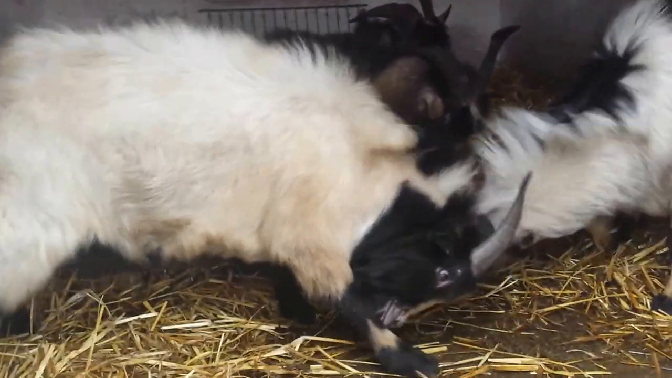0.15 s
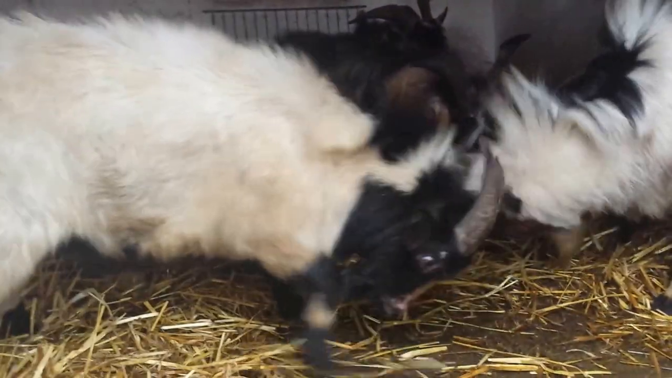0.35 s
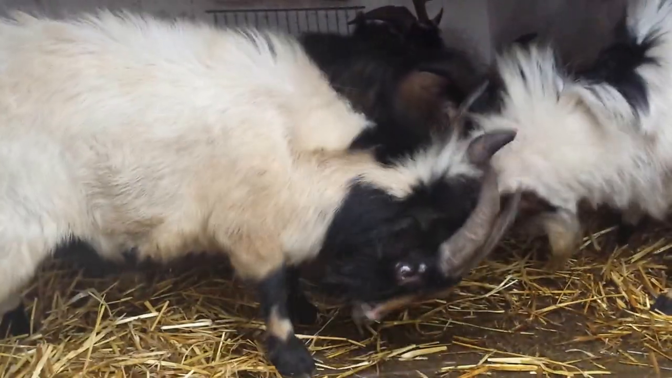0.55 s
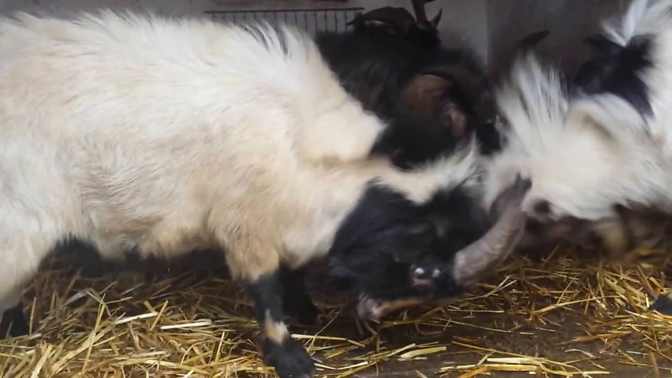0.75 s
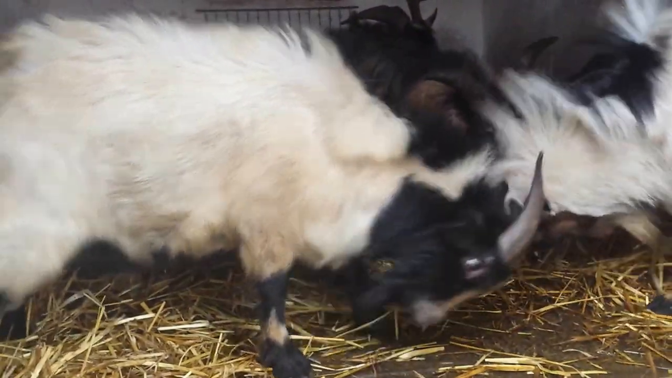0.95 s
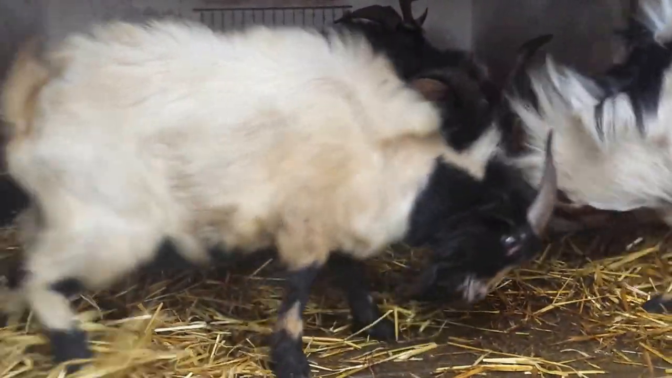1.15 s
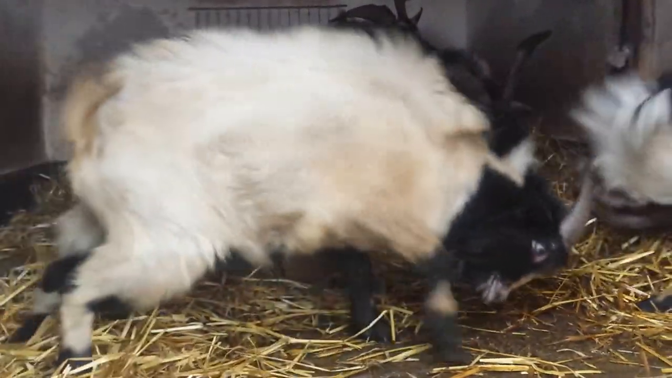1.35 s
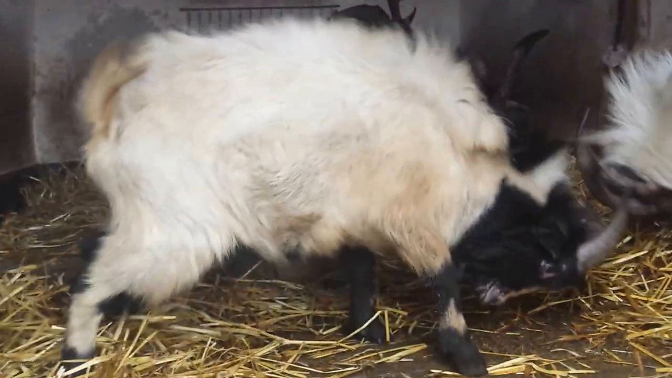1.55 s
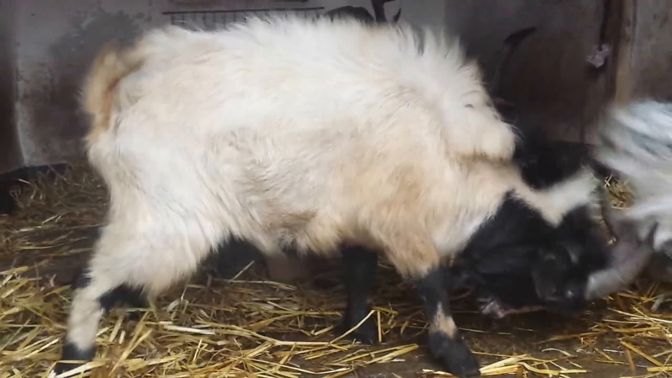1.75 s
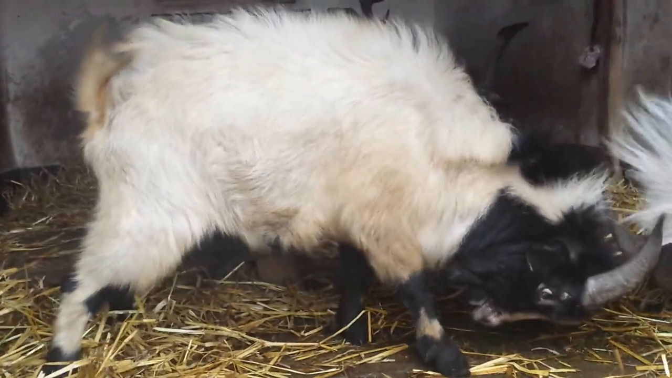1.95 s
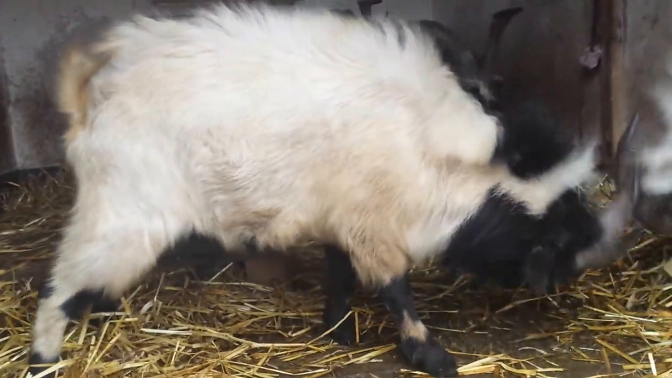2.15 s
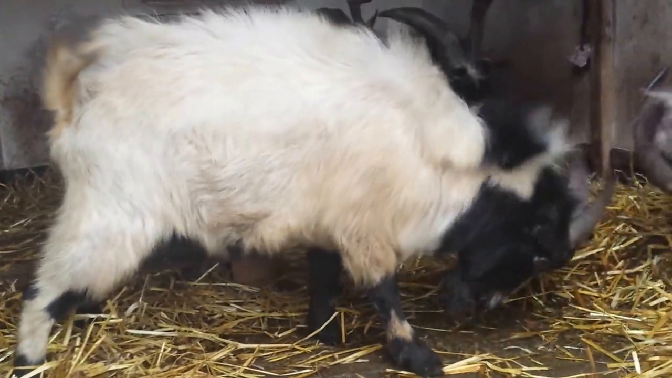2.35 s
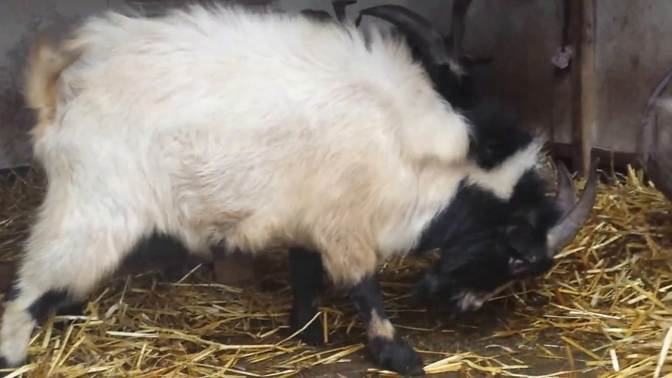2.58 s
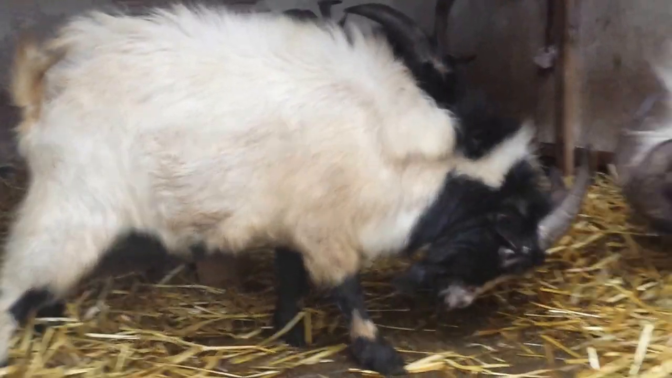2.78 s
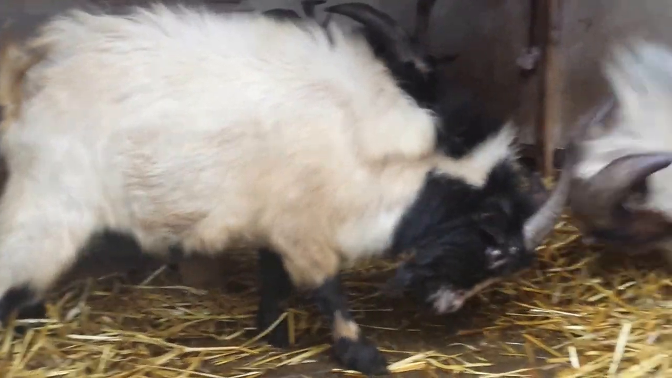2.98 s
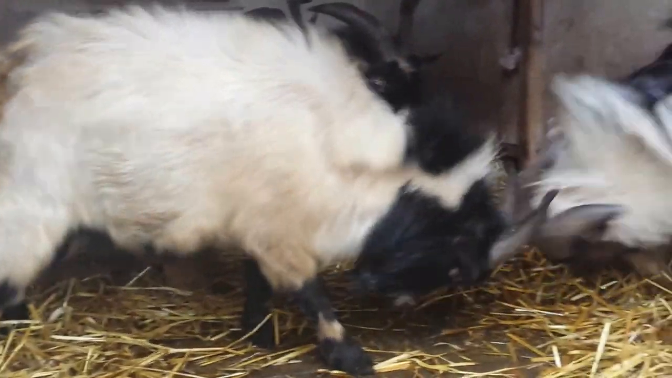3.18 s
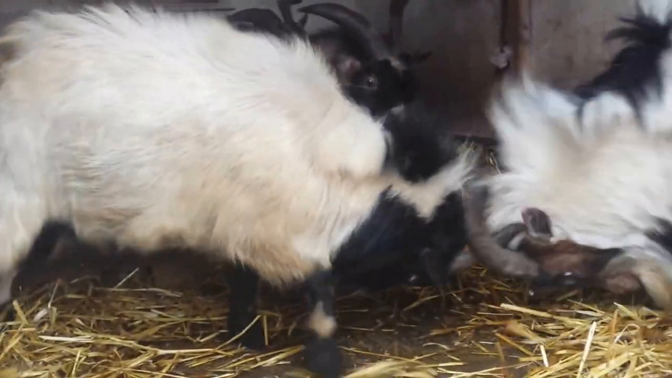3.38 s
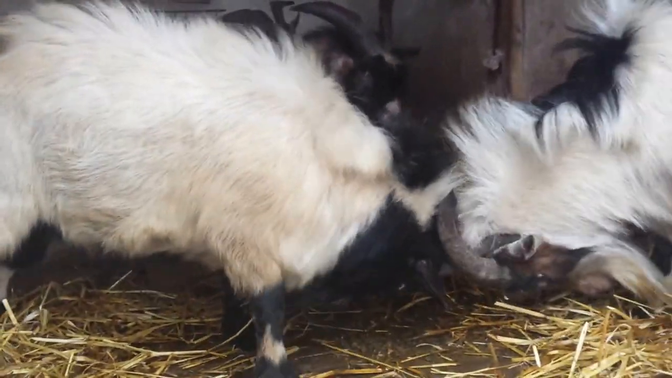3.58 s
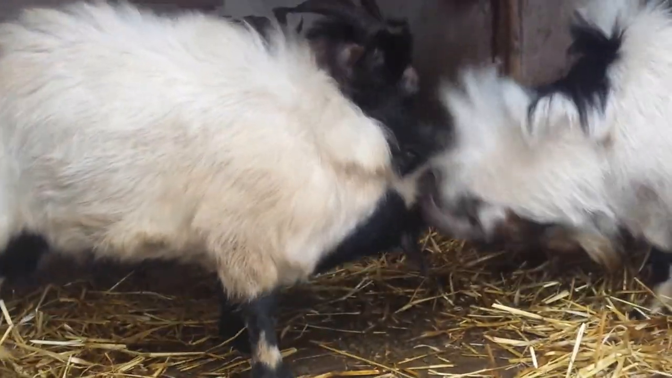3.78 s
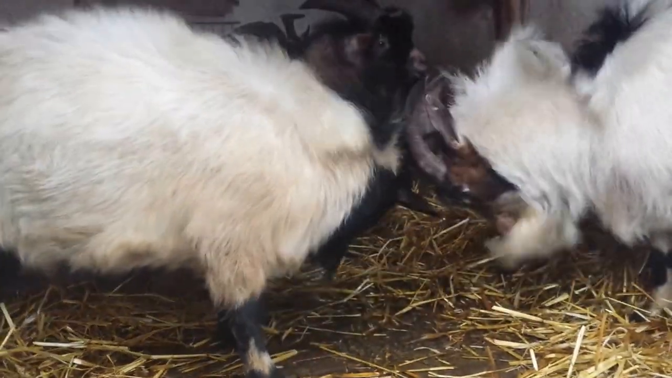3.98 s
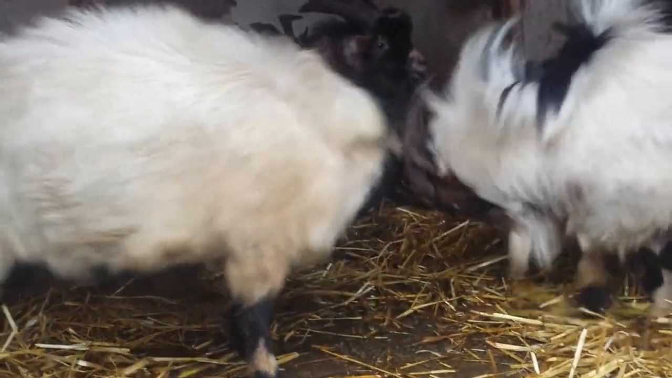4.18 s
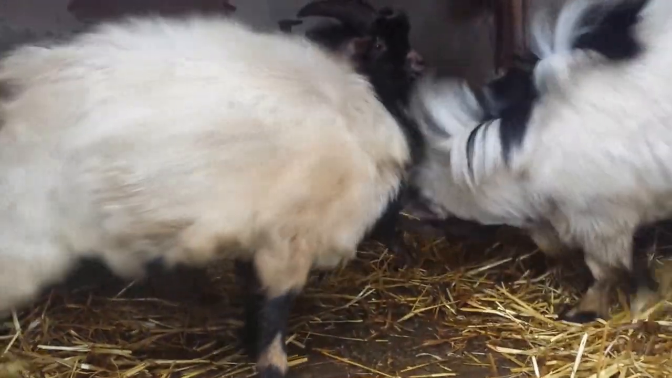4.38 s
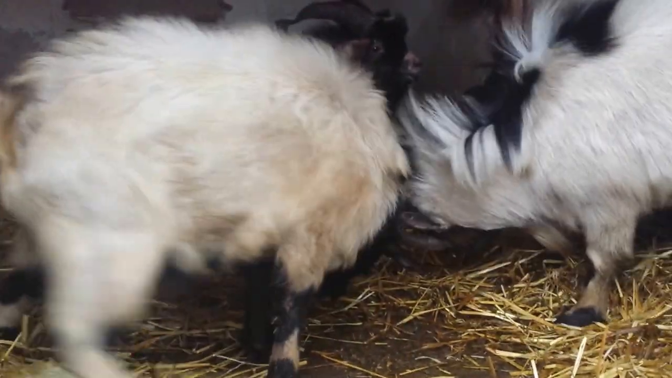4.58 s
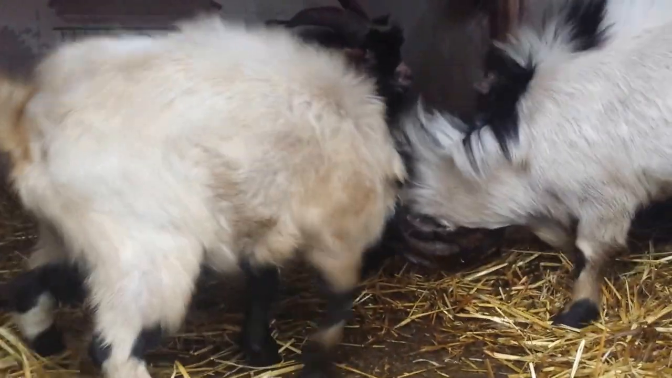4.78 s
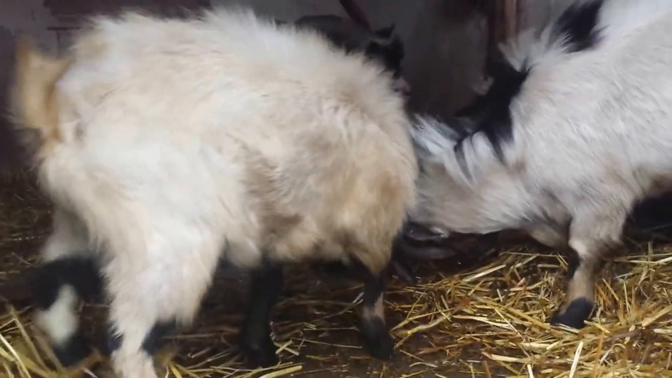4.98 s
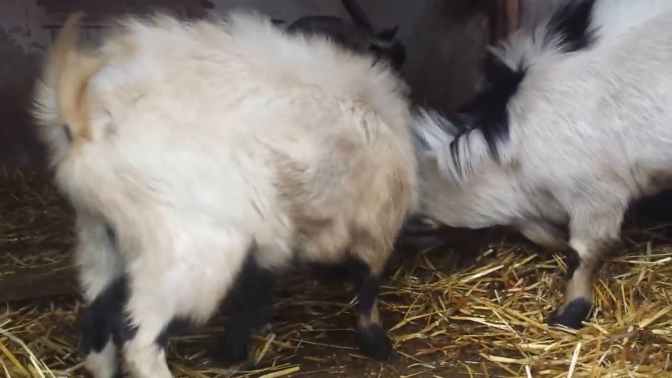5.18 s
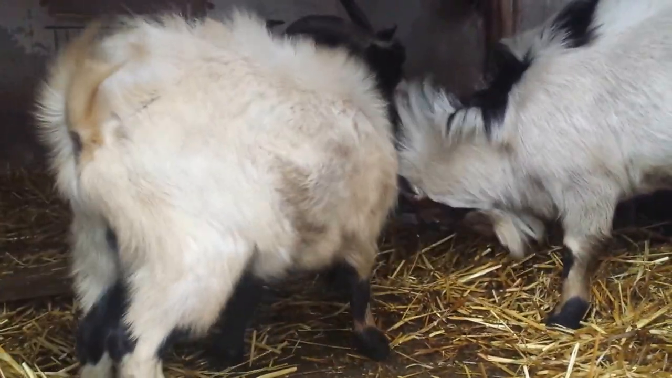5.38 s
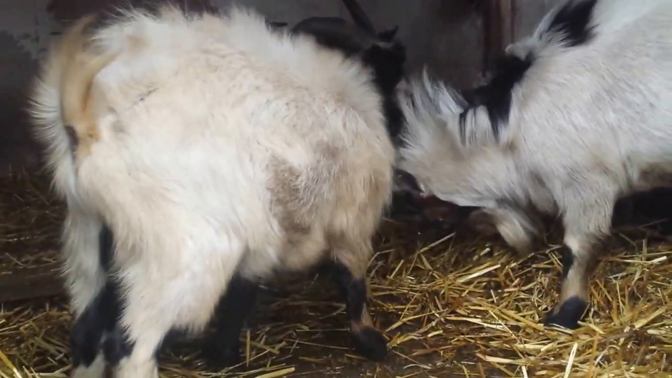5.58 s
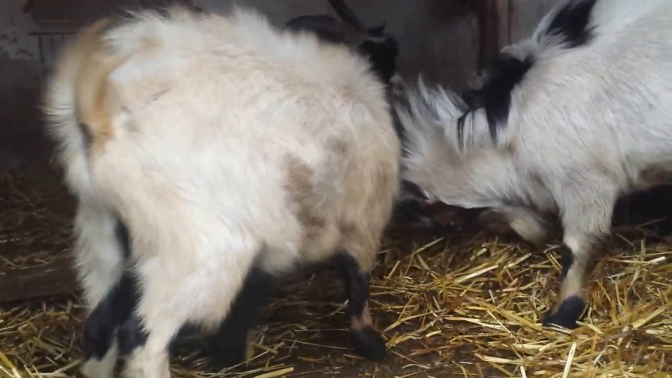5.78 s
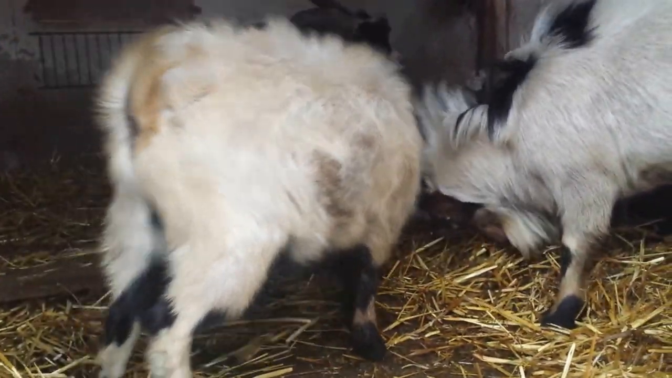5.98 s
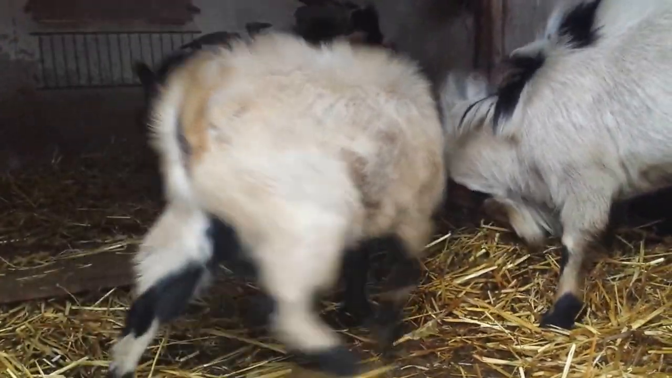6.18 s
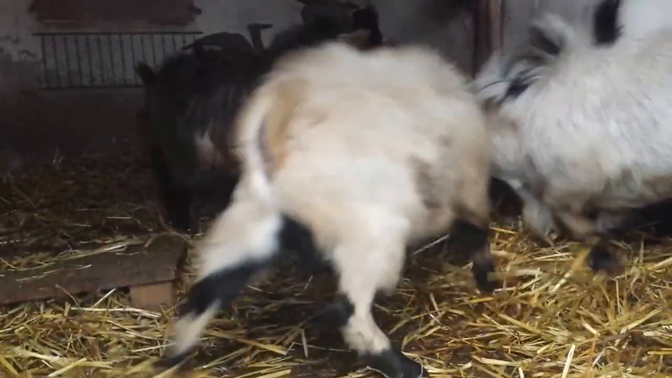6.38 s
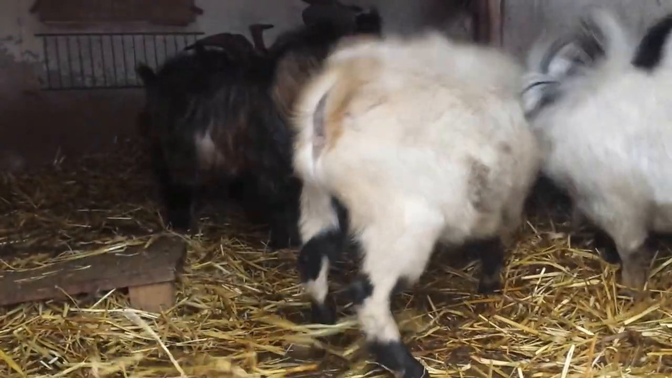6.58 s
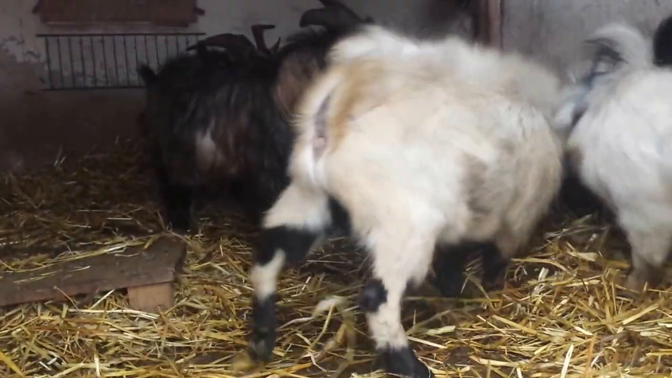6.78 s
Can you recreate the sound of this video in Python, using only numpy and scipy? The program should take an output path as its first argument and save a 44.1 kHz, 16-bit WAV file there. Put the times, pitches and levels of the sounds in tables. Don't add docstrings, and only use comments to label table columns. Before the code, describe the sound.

Close hand-held stereo pickup of goats sparring on straw. Bright stem snaps and fizzing rustle lead, mixed with hollow horn taps and low thumps through the floor. The struggle eases after two seconds into fainter ticks and shuffling, with a few knocks and crisp snaps around four to five seconds. Near six seconds soft low gusts brush the microphone, then bodies bang the boards amid renewed rustling.

```python
import sys
import numpy as np
from scipy import signal
from scipy.io import wavfile
from scipy.ndimage import uniform_filter1d

SR = 44100
rng = np.random.default_rng(int(sys.argv[2]) if len(sys.argv) > 2 else 0)


def master_out(mix):
    frames = np.transpose(np.atleast_2d(mix))
    ceiling = np.clip(frames, -1, 1)
    pcm = np.round(ceiling * 32767).astype(np.int16)
    wavfile.write(sys.argv[1], SR, pcm)


def linear_from_db(decibels):
    return 10 ** (np.asarray(decibels, float) / 20)


N = 302085

# frequency in Hz, density in dB per Hz.
HUSH_COLOUR = [(18, -44), (30, 20.5), (340, 1.5), (815, 1.5), (1480, -10.5), (3500, -32), (5880, -40),
               (14000, -10)]
HUSH_DB = -58
# frequency in Hz, left-right likeness from 0 to 1.
COHERENCE = [(60, 0.97), (300, 0.82), (640, 0.78), (1400, 0.054), (15000, 0)]
# frequency in Hz, 60 dB decay time in seconds.
STALL_DECAY = [(100, 0.36), (500, 0.16), (2000, 0.23), (6000, 0.1), (14000, 0.011)]
# frequency in Hz, width in Hz, lift in dB.
PORTS = [
    [(2570, 4100, 5), (6030, 2160, 16), (12000, 1300, -8.5)],
    [(2300, 2400, 8.5), (7660, 3500, 11), (12900, 13800, 1.5)],
]

# time in seconds, level in dB.
SHUFFLE = [(0.0, -36.5), (0.15, -47), (0.46, -49), (0.8, -52), (1.09, -44), (1.43, -48.5), (1.93, -42),
           (2.02, -56), (2.21, -42), (2.52, -60), (2.78, -59.5), (3.7, -49.5), (5.02, -48), (5.99, -51.5),
           (6.39, -44), (6.52, -43), (6.68, -58), (6.85, -46)]
# frequency in Hz, density in dB per Hz.
SHUFFLE_COLOUR = [(20, -28.5), (40, 6.5), (70, -4.5), (130, -2.5), (250, -8.5), (450, -15.5), (900, -28)]

# centre in seconds, level in dB,
# length in seconds, port (0 left, 1 right).
PUFFS = [(3.848, -43.5, 0.13, 1), (4.187, -49, 0.059, 1), (5.227, -55, 0.08, 1), (5.462, -32, 0.037, 0),
         (5.538, -44, 0.14, 0), (5.687, -39.5, 0.061, 0), (5.748, -49, 0.044, 1), (5.83, -39, 0.12, 1),
         (5.989, -29.5, 0.093, 0), (6.044, -31, 0.086, 0), (6.052, -31, 0.072, 1), (6.138, -36, 0.1, 0),
         (6.194, -16, 0.08, 1), (6.299, -21.5, 0.044, 1), (6.36, -26.5, 0.17, 0), (6.668, -29.5, 0.12, 0),
         (6.802, -43, 0.12, 1)]
# frequency in Hz, density in dB per Hz.
PUFF_COLOUR = [(20, -0.5), (45, 0), (80, 9), (130, 4.5), (220, -7), (400, -22), (700, -45)]

# frequency in Hz, width in Hz, level in dB.
BOARD_MODES = [(315, 28, 0), (398, 35, 0), (516, 28, 3), (585, 28, -1), (684, 35, -1), (775, 35, 2),
               (910, 60, -1), (1170, 70, -3), (1410, 60, -2), (1660, 90, -4)]
# start in seconds, peak in dB, boom in Hz, 60 dB decay time in seconds.
HOOVES = [(0.084, -33.5, 204, 0.13), (1.04, -36, 105, 0.46), (0.985, -28, 68, 0.37),
          (3.84, -39.5, 330, 0.073), (1.76, -27.5, 160, 0.17), (0.37, -46.5, 246, 0.18),
          (0.45, -36, 102, 0.089), (0.705, -28, 109, 0.075), (0.72, -32, 73, 0.16), (0.76, -28, 130, 0.4),
          (1.4574, -37.5, 290, 0.046), (5.207, -36.5, 61, 0.11), (1.73, -16, 207, 0.05),
          (1.705, -23, 220, 0.21), (1.7239, -19.5, 157, 0.25), (3.322, -42, 82, 0.53),
          (3.549, -42, 173, 0.62), (4.306, -37, 117, 0.041)]
HOOF_CLATTER_DB, HOOF_SPOT_HZ = -20, 474
# start in seconds, peak in dB,
# struck spot in Hz, 60 dB decay time in seconds.
RAPS = [(0.068, -22.5, 1060, 0.12), (1.146, -31.5, 695, 0.19), (1.225, -32, 590, 0.11),
        (1.519, -26, 521, 0.18), (1.533, -32, 516, 0.13), (1.62, -38, 536, 0.2), (1.869, -26, 1020, 0.099),
        (2.135, -41.5, 1420, 0.58), (2.19, -42, 1410, 0.21), (6.415, -23, 1000, 0.075),
        (6.62, -30, 800, 0.12), (0.985, -28, 398, 0.083), (2.02, -23.5, 790, 0.093), (6.4, -48, 520, 0.061),
        (2.229, -37, 454, 0.14), (3.91, -31.5, 785, 0.1), (5.17, -36, 465, 0.22), (5.19, -35.5, 770, 0.2),
        (5.279, -40, 393, 0.17), (5.29, -42.5, 1170, 0.16)]
RAP_BOOM_DB, RAP_BOOM_HZ = -17, 148
# start in seconds, peak in dB, boom in Hz, struck spot in Hz, 60 dB decay time in seconds.
SLAMS = [(0.975, -23, 132, 470, 0.18), (0.999, -33, 111, 500, 0.55), (1.689, -36, 196, 840, 0.41),
         (2.004, -24.5, 143, 706, 0.24), (2.336, -50, 305, 870, 0.54), (3.053, -41.5, 188, 865, 0.091),
         (3.462, -49.5, 306, 869, 0.29), (3.835, -36, 121, 824, 0.31), (4.178, -42, 95, 637, 0.37),
         (6.371, -22, 231, 402, 0.31), (6.392, -17, 175, 480, 0.2), (6.546, -23, 174, 343, 0.23),
         (6.608, -22.5, 162, 680, 0.068)]
SLAM_CLATTER_DB = -0.5
CONTACT = 1.5
REACH_DB_PER_OCTAVE = 23.0

# frequency as a ratio to the ring, level in dB.
HORN_MODES = [(1, 0), (.85, -6), (1.17, -4), (.72, -19), (1.4, -14), (1.9, -21)]
# start in seconds, peak in dB, ring in Hz, 60 dB decay time in seconds, echo in dB.
TAPS = [(0.0633, -21, 1970, 0.012, -7), (0.0645, -15, 1100, 0.0089, -21), (0.0705, -28, 1800, 0.003, -5),
        (0.094, -33.5, 1000, 0.0092, -4), (0.373, -35.5, 2670, 0.0047, -4), (0.427, -40, 1900, 0.0076, 2.5),
        (0.634, -30, 2560, 0.0072, -13), (0.7755, -12.5, 2130, 0.0077, -14),
        (0.7768, -23, 2730, 0.0041, -2), (0.783, -27, 1860, 0.008, -16), (0.792, -27.5, 2270, 0.018, -4),
        (0.799, -29, 2400, 0.01, -11), (0.804, -26, 2100, 0.01, -3), (0.811, -33, 2520, 0.007, 0),
        (1.147, -30.5, 714, 0.0062, -5), (1.1492, -33, 1970, 0.0032, 3.5),
        (1.23, -23.5, 2220, 0.0074, -6.5), (1.62, -21, 2570, 0.0045, -5),
        (1.6189, -27.5, 940, 0.0029, -3.5), (1.636, -35, 2100, 0.0087, -3), (1.689, -29.5, 1020, 0.0029, 0),
        (1.69, -21, 2640, 0.0064, -9), (1.872, -44, 1040, 0.022, -10), (3.055, -40, 960, 0.0025, -1),
        (3.066, -43, 1950, 0.0057, -10), (3.089, -41, 2250, 0.0068, -7), (3.3215, -28.5, 1820, 0.0042, -10),
        (3.323, -34, 764, 0.018, -7), (3.338, -35.5, 870, 0.023, -8), (3.463, -31, 2110, 0.0025, -11),
        (3.465, -31, 940, 0.017, -10), (3.834, -31.5, 1700, 0.017, -8), (3.909, -31.5, 1900, 0.01, -4),
        (3.913, -29, 1800, 0.0068, -18), (3.888, -39, 1500, 0.003, 4.5), (3.929, -38, 1850, 0.014, -9),
        (3.93, -36, 900, 0.015, -4), (4.7005, -24, 3070, 0.0056, -5), (5.17, -42.5, 970, 0.0038, 4),
        (6.058, -41.5, 1130, 0.013, -5)]
# start in seconds,
# peak in dB, ring in Hz, 60 dB decay time in seconds, echo in dB.
CLASHES = [(0.9768, -24, 2680, 0.01, -20), (0.978, -20.5, 875, 0.0022, 3), (0.9805, -25, 1860, 0.006, -10),
           (0.982, -29, 3030, 0.005, -11), (3.8196, -26.5, 6100, 0.009, -5),
           (6.5505, -36.5, 1770, 0.004, -18), (1.731, -27.5, 1940, 0.013, -9),
           (1.7505, -18.5, 1780, 0.014, -7.5), (2.009, -20.5, 2300, 0.0025, -4.5),
           (6.399, -22.5, 1590, 0.011, -8), (6.548, -17.5, 1050, 0.0032, -4),
           (6.614, -18.5, 794, 0.0038, -9)]
TAP_LEAD, CLASH_LEAD = 4, 16

# start in seconds, peak in dB, left minus right in dB, pitch in Hz, 60 dB decay time in seconds.
SNAPS = [(0.063, -10, 11, 5470, 0.012), (0.0702, -9, 6, 6170, 0.0054), (0.633, -4.5, 4.5, 6100, 0.0059),
         (0.7745, -1, 1.5, 7500, 0.003), (0.811, -14, 12, 5900, 0.004), (0.8655, -11, 7, 8800, 0.008),
         (0.9073, -2.5, 1, 9800, 0.01), (0.9748, -8, 3, 5330, 0.0052), (0.9795, -18, 4, 4200, 0.0098),
         (1.053, -16, 0, 6800, 0.011), (1.0986, -22, -1, 6800, 0.006), (1.1025, -28, -2, 7700, 0.004),
         (1.2295, -13.5, 12, 5560, 0.0055), (1.3546, -14.5, 2, 7860, 0.0061), (1.511, -8, -4, 7000, 0.0049),
         (1.618, -17.5, 5, 4970, 0.007), (1.6885, -15, 6, 5700, 0.0063), (1.7495, -16, 0.5, 6500, 0.0068),
         (1.943, -9.5, 5, 5170, 0.012), (2.0078, -16.5, 7, 5970, 0.0086), (2.0963, -18, -4.5, 8500, 0.0041),
         (3.0888, -21.5, -2, 5400, 0.0057), (3.24, -19, 4, 8100, 0.0061), (3.778, -18, -11.5, 6200, 0.0045),
         (3.8198, -15, -5, 6100, 0.0062), (4.0438, -17.5, 9, 6570, 0.011),
         (4.286, -20.5, -15, 7960, 0.0082), (4.3608, -4.5, 7, 8300, 0.0048), (4.69, -14.5, -1, 8500, 0.003),
         (4.7002, -7.5, 1, 6480, 0.0064), (4.759, -14, -8.5, 9000, 0.011),
         (4.7922, -16.5, 1.5, 6500, 0.007), (6.393, -4, -12, 11000, 0.01),
         (6.3975, -17, -12, 11000, 0.0071), (6.4835, -16, 3, 7500, 0.0063)]
# start in seconds, peak in dB, pitch in Hz.
TICKS = [(0.293, -23, 6300), (0.6715, -18.5, 6520), (0.9164, -27, 8000), (1.726, -18, 6200),
         (1.73, -18, 5960), (1.8993, -33, 5870), (2.2365, -28, 5400), (3.841, -22, 6300), (5.8, -27, 8000),
         (5.628, -24, 9900), (5.912, -31, 8000), (2.17, -23, 7740), (2.3124, -34, 5950),
         (2.7736, -39.5, 9460), (2.811, -42, 5890), (3.0654, -50, 4480), (3.077, -30.5, 5880),
         (3.107, -36, 6180), (3.429, -25.5, 6100), (3.4994, -27.5, 3730), (3.9787, -23, 5800),
         (4.0044, -27, 5600), (3.447, -25, 6000), (3.21, -30, 6000), (3.344, -26, 6500), (4.194, -20, 8500),
         (4.485, -27, 6500), (4.905, -24, 6200), (5.199, -27.5, 6500), (1.331, -22, 3984),
         (0.96, -24, 6510), (4.211, -29, 5710), (4.375, -27, 5690), (4.5544, -37, 5910),
         (4.6424, -17, 6170), (4.7016, -11, 8350), (4.784, -25, 5780), (4.804, -38, 5876),
         (4.8708, -25, 6370), (5.077, -26, 5750), (5.184, -27, 5640), (5.415, -38, 8070),
         (5.6164, -15, 10800), (5.795, -20.5, 6440), (6.0907, -20, 6160), (6.3289, -22, 6100),
         (6.493, -19, 6030), (6.538, -29, 5510), (6.8218, -19, 5830)]
TICK_T60_S, SNAP_ECHO_DB = 0.0056, -10.5
CRACK_LOW, CRACK_HIGH = 0.56, 1.52

# frequency in Hz, density in dB per Hz.
RUSTLE = [(1500, -42), (3000, -3), (4500, 2.5), (7000, -0.5), (10000, 5), (14000, 6), (16000, -40)]
# frequency in Hz, density in dB per Hz.
CRUNCH = [(250, -8.5), (500, -1), (900, -3.5), (1500, -3.5), (2200, -3.5), (3200, -3.5), (4500, -6.5)]
# loudest moment in seconds, rustle in dB, swell in seconds, settle in seconds.
SWEEPS = [(0.001, -30, .05, 0.045), (0.079, -37.5, 0.02, 0.25), (0.246, -35.5, 0.15, 0.17),
          (0.4, -35.5, 0.13, 0.066), (0.645, -33, 0.12, 1), (0.863, -25.5, 0.061, 0.13),
          (1.116, -28, 0.049, 0.12), (1.24, -56, .1, 0.098), (1.526, -27.5, 0.2, 0.22),
          (1.741, -31.5, 0.066, 0.097), (1.865, -33.5, 0.077, 0.24), (2.102, -30.5, 0.062, 0.057),
          (2.33, -34, 0.12, 0.073), (3.1, -40.5, 0.012, 0.66), (3.256, -33, 0.052, 0.19),
          (3.657, -31, 0.031, 0.055), (3.836, -31, 0.17, 0.052), (4.201, -31, 0.099, 0.11),
          (4.371, -33.5, 0.012, 0.14), (4.519, -30.5, 0.11, 0.39), (4.754, -29, 0.19, 0.2),
          (5.081, -40.5, 0.29, 0.078), (5.195, -37.5, 0.38, 0.023), (5.67, -37, 0.18, 0.28),
          (5.908, -36.5, 0.031, 0.066), (6.003, -38.5, 0.023, 0.057), (6.133, -31.5, 0.069, 0.16),
          (6.37, -28.5, 0.053, 0.12), (6.54, -33, 0.37, 0.2), (6.847, -30, 0.16, .1)]
# time in seconds, crunch in dB, settle in seconds.
TREADS = [(0.083, -25.5, 0.04), (0.4, -41, 0.18), (0.65, -39, 0.027), (0.793, -29.5, 0.046),
          (1.007, -33.5, 0.065), (1.239, -31, 0.03), (1.74, -28.5, 0.073), (1.865, -38, 0.29),
          (2.028, -39.5, 0.31), (2.249, -38, 0.047), (3.087, -48, 0.053), (3.339, -40, 0.013),
          (3.493, -44.5, 0.057), (3.936, -51, 0.018), (5.195, -41.5, 0.077), (6.391, -26, 0.044),
          (6.552, -33.5, 0.13)]
TREAD_SWELL_S, SWEEP_CRUNCH_DB, STILL_DB, SWELL_BEND = 0.021, -8.5, -69, 1.6


def evened(x):
    return x / np.sqrt(np.mean(x ** 2) + 1e-20)


def read(points, hz):
    f, value = np.transpose(points)
    return np.interp(np.log(hz + 1), np.log(f + 1), value)


def add(mix, s, sound):
    part = mix[:, max(round(s * SR), 0):][:, :sound.shape[1]]
    part += sound[:, :part.shape[1]]


def chance(rows, size):
    strip = rng.standard_normal(N + size)
    return [strip[round(row[0] * 200) * SR // 200:][:size] for row in rows]


def causal(db):
    log_gain = np.log(linear_from_db(np.r_[db, db[-2:0:-1]]))
    phase = -signal.hilbert(log_gain).imag
    return np.fft.ifft(np.exp(log_gain + 1j * phase)).real[:1024]


def coloured(x, points):
    taps = causal(np.maximum(read(points, np.fft.rfftfreq(2048, 1 / SR)), -70))
    return evened(signal.oaconvolve(x, taps[None], axes=1)[:, :N])


def diffuse(points, patchy_db):
    frames, hz = N // 256 + 5, np.fft.rfftfreq(1024, 1 / SR)
    a, b, c, d, patches = rng.standard_normal((frames, 513, 5)).T
    patches = uniform_filter1d(patches, size=10, axis=0)
    patches = evened(uniform_filter1d(patches, size=8, axis=1))
    same = np.clip(read(COHERENCE, hz), -1, 1)[:, None]
    left = a + 1j * b
    right = same * left + np.sqrt(1 - same ** 2) * (c + 1j * d)
    z = np.array([left, right]) * linear_from_db(read(points, hz)[:, None] + patchy_db * patches)
    return evened(signal.istft(z, nperseg=1024, noverlap=768)[1][:, :N])


def placed(sound, pan_db, lead):
    both = np.array([np.r_[sound, np.zeros(40)]] * 2)
    both[int(lead >= 0)] = np.roll(both[0], abs(lead))
    return both * linear_from_db(np.array([[pan_db], [-pan_db]]) / 2)


def stall(x):
    out, turn = np.zeros((2, N)), np.arange(N) / SR * 23.0
    for k in range(3):
        taps = np.zeros((2, SR // 2))
        at = np.arange(120, SR // 2 - 20, 20) + rng.integers(0, 20, (2, (SR // 2 - 121) // 20))
        np.put_along_axis(taps, at, rng.choice([-1., 1.], at.shape), 1)
        taps[:, rng.integers(150, 1200, 6)] *= 3.5
        bass = signal.butter(2, 700, fs=SR)
        taps[1] += signal.lfilter(*bass, 0.87 * (taps[0] - taps[1]))
        hz, t, z = signal.stft(taps, SR, nperseg=128)
        decay = linear_from_db(-60 * t / np.maximum(read(STALL_DECAY, hz), .03)[:, None])
        tail = signal.istft(z * decay, SR, nperseg=128)[1]
        tail = tail / np.linalg.norm(tail[0])
        share = np.sqrt(2 / 3) * np.cos(turn + k * np.pi / 3)
        out += signal.fftconvolve(x.mean(0)[None] * share, tail, axes=1)[:, :N]
    return out


def hush():
    return linear_from_db(HUSH_DB) * diffuse(HUSH_COLOUR, patchy_db=1.5)


def shuffle():
    s, db = np.transpose(SHUFFLE)
    level_db = np.interp(np.arange(N) / SR, s, db)
    return linear_from_db(level_db) * diffuse(SHUFFLE_COLOUR, patchy_db=1.5)


def puffs():
    gusts, t = np.zeros((2, N)), np.arange(N) / SR
    for s, db, length, port in PUFFS:
        gusts[round(port)] += linear_from_db(db) * np.exp(-(2.47 * (t - s) / length) ** 2)
    air = coloured(rng.standard_normal((2, N)), PUFF_COLOUR)
    steady = air / np.sqrt(uniform_filter1d(air ** 2, size=1200))
    return gusts * steady


def thumps():
    out, t = np.zeros((2, N)), np.arange(12000) / SR
    hits = [(s, db, hz, HOOF_CLATTER_DB, HOOF_SPOT_HZ, t60) for s, db, hz, t60 in HOOVES]
    hits += [(s, db + RAP_BOOM_DB, RAP_BOOM_HZ, -RAP_BOOM_DB, hz, t60) for s, db, hz, t60 in RAPS]
    hits += [(s, db, hz, SLAM_CLATTER_DB, spot_hz, t60) for s, db, hz, spot_hz, t60 in SLAMS]
    hits.sort()
    for (s, db, hz, clatter_db, spot_hz, t60), noise in zip(hits, chance(hits, size=12000)):
        push = CONTACT * (t < .0002) + noise * (1 - np.exp(-t / 0.0014))
        push = push * linear_from_db(-60 * t / max(t60, .02))
        floor = np.sin(2 * np.pi * hz * t) + 0.18 * np.sin(2 * np.pi * 1.65 * hz * t)
        floor = floor * linear_from_db(-60 * t / 0.042)
        boards = np.zeros(len(t))
        for f, width, mode_db in BOARD_MODES:
            reach_db = mode_db - REACH_DB_PER_OCTAVE * abs(np.log2(f / spot_hz))
            decay_db = -60 / 2.2 * t * width
            boards += linear_from_db(reach_db + decay_db) * np.sin(2 * np.pi * f * t)
        boom = signal.fftconvolve(push, floor)[:len(t)]
        clatter = signal.fftconvolve(push, boards)[:len(t)]
        boom = signal.lfilter(*signal.butter(2, .6 * hz, "high", fs=SR), boom)
        sound = boom / abs(boom).max() + linear_from_db(clatter_db) * clatter / abs(clatter).max()
        add(out, s + 0.00097, placed(linear_from_db(db) * sound, 0.082, lead=7))
    return out


def knocks():
    dry, wet, t = np.zeros((2, N)), np.zeros((2, N)), np.arange(2000) / SR
    blows = sorted([(*row, TAP_LEAD) for row in TAPS] + [(*row, CLASH_LEAD) for row in CLASHES])
    for (s, db, hz, t60, echo_db, lead), noise in zip(blows, chance(blows, size=90)):
        ring = np.zeros(len(t))
        for ratio, level_db in HORN_MODES:
            decay_db = -60 * t * ratio / max(t60, .003)
            ring += linear_from_db(level_db + decay_db) * np.sin(2 * np.pi * hz * ratio * t)
        blow = (4 * (t[:90] == 0) + noise) * linear_from_db(-60 * t[:90] / 0.0016)
        ring = np.convolve(blow, ring * (1 - np.exp(-t * hz)))
        ring = signal.lfilter(*signal.butter(2, .7 * hz, "high", fs=SR), ring)
        ring = placed(linear_from_db(db + 1.5) * ring / abs(ring).max(), -3, lead)
        add(dry, s + .0006, ring)
        add(wet, s + .001, linear_from_db(echo_db) * ring)
    return dry, wet


def snaps():
    out, t = np.zeros((2, N)), np.arange(200) / SR
    ticks = [(s, db, None, hz, TICK_T60_S) for s, db, hz in TICKS]
    stems = sorted(list(SNAPS) + ticks, key=lambda row: row[0])
    for (s, db, pan_db, hz, t60), noise in zip(stems, chance(stems, size=200)):
        pan_db = 2 * noise[-2] if pan_db is None else pan_db
        crack = (4.5 * (t == 0) + noise) * linear_from_db(-60 * t / np.clip(t60, .002, .02))
        band = [CRACK_LOW * hz, min(CRACK_HIGH * hz, 16000)]
        crack = signal.lfilter(*signal.butter(2, band, "band", fs=SR), crack)
        crack = crack - .6 * signal.lfilter(*signal.iirpeak(6000, 2.5, fs=SR), crack)
        crack = linear_from_db(db - 7.) * crack / abs(crack).max()
        add(out, s + .001, placed(crack, np.clip(pan_db, -10, 10), lead=int(13 + 3 * noise[-1])))
    return out


def swells(rows):
    s, db, swell, settle = np.transpose(rows)[:, :, None]
    t = np.arange(0, N + 32, 32) / SR
    away = np.maximum((s - t) / np.maximum(swell, .005), (t - s) / np.maximum(settle, .005))
    power = (linear_from_db(db - 10 * away ** SWELL_BEND) ** 2).sum(0)
    gain = np.sqrt(power + linear_from_db(STILL_DB) ** 2)
    return np.interp(np.arange(N) / SR, t, gain)


def grains(per_s, spread_db, blur, pitches_hz):
    size = linear_from_db(spread_db * np.minimum(rng.exponential(1, N), 3.)) * rng.choice([-1., 1.], N)
    breaks = size * (rng.random(N) < per_s / SR)
    kind = rng.integers(0, len(pitches_hz), N)
    near = np.zeros((2, N))
    for k, hz in enumerate(pitches_hz):
        band = signal.butter(1, [.75 * hz, 1.33 * hz], "band", fs=SR)
        ping = signal.lfilter(*band, breaks * (kind == k))
        pair = np.array([ping, np.roll(ping, 9 * k - 8)])
        near += evened(pair) * np.sqrt(hz)
    drift = uniform_filter1d(uniform_filter1d(rng.standard_normal(N), size=600), size=400)
    flicker = linear_from_db(1.8 * evened(drift))
    return flicker * (evened(near) + blur * rng.standard_normal((2, N)))


def straw():
    stirred = swells(SWEEPS)
    trodden = swells([(s, db, TREAD_SWELL_S, settle) for s, db, settle in TREADS])
    weight = np.hypot(linear_from_db(SWEEP_CRUNCH_DB) * stirred, trodden)
    fizz = grains(per_s=3000., spread_db=4.0, blur=.85, pitches_hz=[3500, 5500, 8000, 11500])
    coarse = grains(per_s=900., spread_db=0.5, blur=2.56, pitches_hz=[690, 960, 1700, 3120])
    rustle = linear_from_db(-10.5) * stirred * coloured(fizz, RUSTLE)
    crunch = linear_from_db(-6.5) * weight * coloured(coarse, CRUNCH)
    return rustle + crunch


def scene():
    snap, thump = snaps(), thumps()
    knock, knock_wet = knocks()
    echoes = stall(linear_from_db(SNAP_ECHO_DB) * snap + knock_wet + linear_from_db(-9.0) * thump)
    return hush() + shuffle() + puffs() + echoes + thump + knock + snap + straw()


def top_cut(x):
    return signal.sosfilt(signal.butter(12, 16400, fs=SR, output="sos"), x)


def record(dry):
    hz = np.fft.rfftfreq(2048, 1 / SR)
    trim_db = -11. / (1 + np.exp((14750 - hz) / 60))
    responses = []
    for port in PORTS:
        lift_db = sum(db / (1 + (2 * (hz - f) / width) ** 2) for f, width, db in port)
        responses.append(causal(trim_db + lift_db))
    heard = signal.oaconvolve(dry, np.array(responses), axes=1)[:, :N]
    heard = signal.lfilter(*signal.butter(2, 55, "high", fs=SR), heard)
    return top_cut(np.clip(heard, -.98, .98))


dry = scene()
out = record(dry)
master_out(out)
```